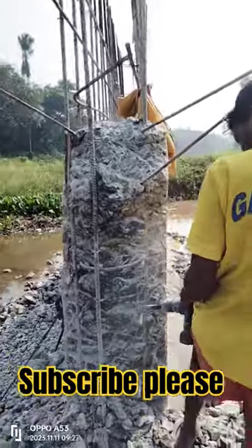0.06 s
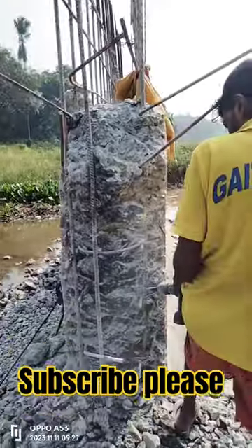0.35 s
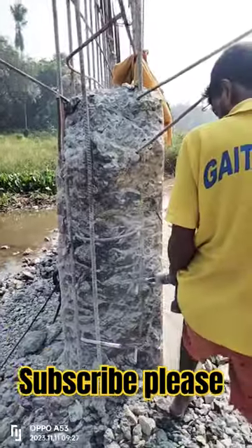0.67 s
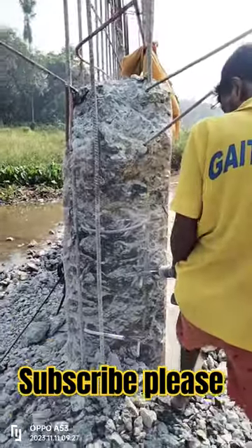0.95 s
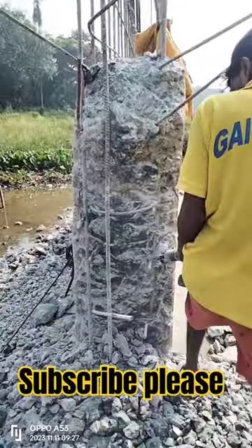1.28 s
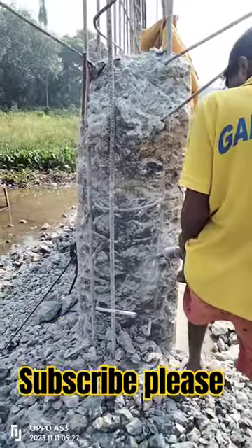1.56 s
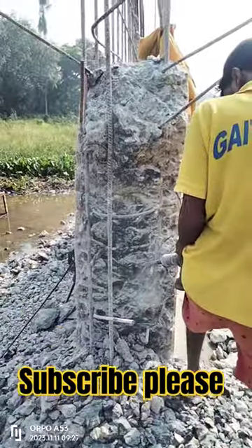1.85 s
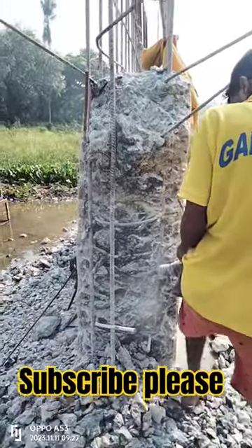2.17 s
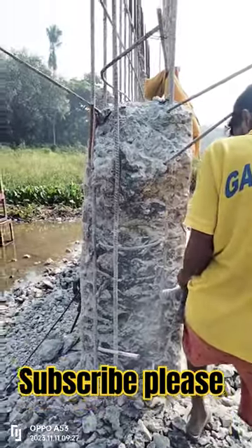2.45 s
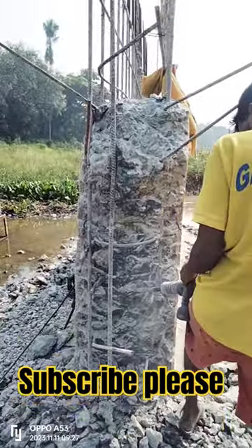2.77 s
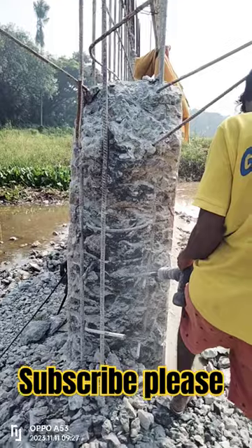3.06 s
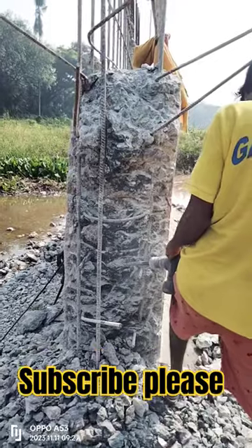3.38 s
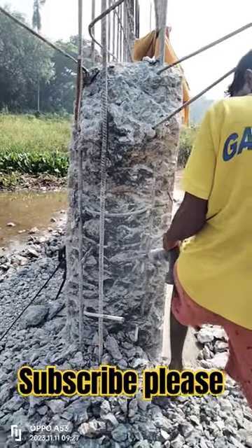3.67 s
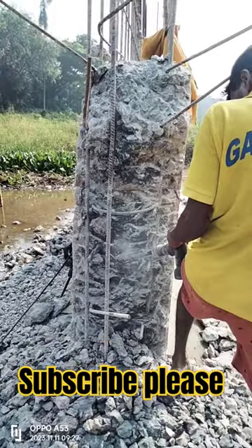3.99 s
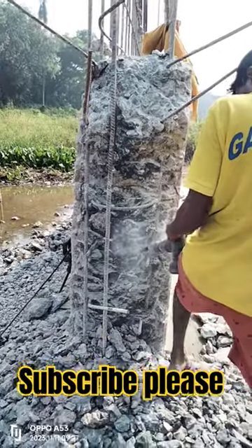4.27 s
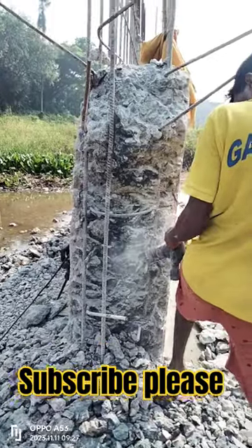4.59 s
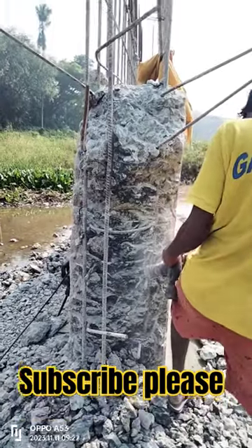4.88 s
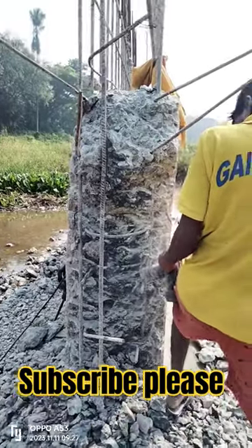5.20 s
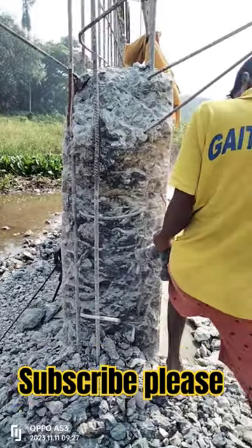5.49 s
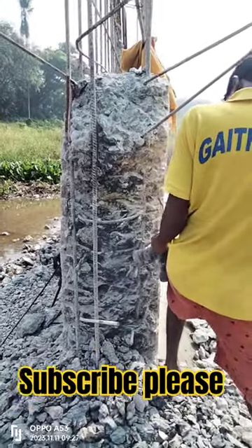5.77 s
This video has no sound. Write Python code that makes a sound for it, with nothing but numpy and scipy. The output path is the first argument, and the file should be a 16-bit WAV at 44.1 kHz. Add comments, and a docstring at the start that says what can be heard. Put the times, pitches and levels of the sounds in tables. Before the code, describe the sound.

An electric demolition hammer runs outdoors, a few steps away, its motor, fan and gears churning with a rattle and a thin high whine. At about 0.6 seconds the chisel starts striking a concrete pillar, roughly twenty-five blows a second in short bursts, each a sharp crack with clattering chips and a bright steel ring. A brief rising squeak comes near 1.3 seconds, and the blows turn to glancing metallic clinks toward 2 seconds. From 2 to about 3.1 seconds the hammering stops and the motor whirs freely, whining, with one light ping of the chisel. Rapid hammering then resumes and continues with tiny gaps until the end at about 6 seconds. Near 3.9 seconds the tool gives a faint howl and lumps break off with heavy knocks. More knocks follow between 4.5 and 5 seconds as the blows become firmer and more thudding.

```python
"""Demolition hammer on concrete

An electric hammer breaks a reinforced concrete pile outdoors, a few steps away. Its crank turns
about 25 times a second: pressed on, every turn drives the chisel into the concrete; lifted, only
gears and fan churn. Each blow is a crack, a knock and a thud, a short clatter of steel and chips,
and the ring of the chisel."""
import sys
import numpy as np
from scipy import signal
from scipy.fft import rfft, irfft
from scipy.io import wavfile
from scipy.ndimage import uniform_filter1d

SR = 44100
rng = np.random.default_rng(int(sys.argv[2]) if len(sys.argv) > 2 else 0)


def store_wav(level_fs):
    """Save 16-bit WAV to argv[1]."""
    pcm = np.round(np.clip(np.atleast_2d(level_fs), -1, 1) * 32767)
    wavfile.write(sys.argv[1], SR, pcm.T.astype(np.int16))


N = 266364
TIME = np.arange(N) / SR
BLOW_TIME = np.arange(4096) / SR
TURNS_PER_S = 25


def from_db(db):
    """Decibels to gain."""
    return 10 ** (np.asarray(db) / 20)


def unit_rms(x):
    """Scale each row to rms 1."""
    return x / np.sqrt(np.mean(x ** 2, axis=-1, keepdims=True) + 1e-20)


def curve(rows):
    """Interpolate (seconds, value) rows at every sample."""
    return np.interp(TIME, *np.transpose(rows))


def decay(t60_s):
    """Envelope that falls 60 dB in t60_s."""
    return from_db(-60 * BLOW_TIME / t60_s)


def lay(times, sounds):
    """Add one short sound at each time."""
    out = np.zeros(N + len(BLOW_TIME))
    for start_s, sound in zip(times, sounds):
        start = round(start_s * SR)
        out[start:start + len(sound)] += sound
    return out[:N]


def colour(x, spectrum, resonances=(), size=2048):
    """Minimum-phase filter with a given spectrum and resonant humps."""
    hz = np.maximum(np.arange(size // 2 + 1) * SR / size, 1)
    point_hz, point_db = np.transpose(spectrum)
    db = np.interp(np.log(hz), np.log(point_hz), point_db)
    for centre_hz, width_hz, lift_db in resonances:
        db = db + lift_db / (1 + (2 * (hz - centre_hz) / width_hz) ** 2)
    cepstrum = irfft(np.log(from_db(db)))
    cepstrum[1:size // 2] *= 2
    cepstrum[size // 2 + 1:] = 0
    impulse = irfft(np.exp(rfft(cepstrum)))
    return signal.fftconvolve(np.atleast_2d(x), impulse[None], axes=1)[:, :x.shape[-1]]


def bursts(times, level_db, envelope, spectrum, held_s, resonances=(), snap=0):
    """Dense modes dying together after an optional snap, with the energy of level_db held for held_s."""
    drive = rng.standard_normal((len(times), len(BLOW_TIME))) * envelope
    drive[:, 0] += snap * np.linalg.norm(envelope)
    sounds = unit_rms(colour(drive, spectrum, resonances))
    return lay(times, sounds * np.sqrt(held_s / BLOW_TIME[-1]) * from_db(level_db)[:, None])


def wavering_tone(rows, width_hz, steady):
    """Tone on a pitch and level curve: pure at steady=1, a narrow noise band at 0."""
    times, hz, level_db = np.transpose(rows)
    lowpass = signal.butter(2, width_hz / 2, fs=SR, output="sos")
    drift = signal.sosfilt(lowpass, rng.standard_normal((2, N)))
    along, across = unit_rms(drift) * np.sqrt(1 - steady)
    phase = 2 * np.pi * np.cumsum(np.interp(TIME, times, hz)) / SR
    wave = (np.sqrt(2 * steady) + along) * np.sin(phase) + across * np.cos(phase)
    return wave * np.interp(TIME, times, from_db(level_db), left=0, right=0)


# Runs of blows, paced by the load. Each row: first blow in seconds, last blow in seconds, count.
BLOW_RUNS = [(.5822, .7465, 5), (.8345, 1.044, 6), (1.1275, 1.3257, 6), (1.3625, 1.5998, 7),
             (1.644, 1.7605, 4), (1.8395, 1.9935, 5), (2.0297, 2.0297, 1), (3.1384, 3.1833, 2),
             (3.2235, 3.346, 4), (3.3903, 3.736, 9), (3.8178, 3.8972, 3), (3.9327, 3.9719, 2),
             (4.0215, 4.0215, 1), (4.0868, 4.5322, 13), (4.573, 4.741, 5), (4.7865, 4.9198, 4),
             (4.960, 5.128, 5), (5.1663, 5.4458, 8), (5.493, 5.493, 1), (5.526, 5.759, 7),
             (5.8013, 6.0018, 6)]


def blow_times():
    """One blow per crank turn, evenly spaced within a run."""
    return np.concatenate([np.linspace(first, last, round(count)) for first, last, count in BLOW_RUNS])


def crank():
    """Crank angle in radians, whole turns between blows, and load (1 while pressed on)."""
    blows_s = blow_times()
    start_s = blows_s[0] - np.ceil(blows_s[0] * TURNS_PER_S) / TURNS_PER_S
    strokes_s = np.concatenate([[start_s], blows_s, [blows_s[-1] + 1 / TURNS_PER_S]])
    turns = np.cumsum(np.round(np.diff(strokes_s, prepend=start_s) * TURNS_PER_S))
    hits = np.zeros(N)
    hits[np.round(blows_s * SR).astype(int)] = 1
    hits_per_s = uniform_filter1d(uniform_filter1d(hits, size=3600), size=1800) * SR
    load = np.clip(hits_per_s / TURNS_PER_S, 0, 1)
    return 2 * np.pi * np.interp(TIME, strokes_s, turns), load


# Machine noise as heard. Each row: time in seconds, base level in dB.
HEARD_LEVEL = [(0.0, -32), (0.49, -32), (0.57, -31), (0.77, -43), (0.93, -38), (1.35, -35), (1.5, -46.5),
               (1.61, -43), (1.92, -34.5), (2.34, -31.5), (3.18, -33.5), (3.5, -40.5), (3.95, -39),
               (4.05, -33.5), (4.19, -36.5), (4.31, -38.5), (4.61, -42.5), (4.71, -43.5), (5.0, -43.5),
               (5.38, -41.5), (5.74, -43.5), (6.04, -44)]
# Brief dips in gaps between blows. Each row: centre in seconds, depth in dB.
GAP_DIPS = [(.79, 2.5), (1.085, 11.5), (3.78, 2.5), (4.02, 11.5)]


def heard_db(half_width_s=0.043):
    """Machine noise level, ducked as by automatic gain control during hammering, with dips in gaps."""
    dips_db = sum(depth_db * np.exp(-((TIME - at_s) / half_width_s) ** 2) for at_s, depth_db in GAP_DIPS)
    return curve(HEARD_LEVEL) - dips_db


# Gear noise spectrum. Each row: frequency in Hz, relative density in dB.
GEAR_SPECTRUM = [(30, -9.5), (100, -14), (220, -5), (500, -6.5), (900, -2.5), (2000, -3.5), (3200, -4.5),
                 (4500, -3), (5300, -5), (7000, -1.5), (8800, 0.5), (10600, -13.5), (15500, -14.5)]
# Gear housing resonances. Each row: centre in Hz, width in Hz, lift in dB.
HOUSING_MODES = [(593, 260, 8.5), (888, 21, 7), (1194, 350, 4.5), (1670, 143, 7), (2470, 790, 2.5),
                 (3060, 500, 4), (3760, 500, 3.5), (4680, 200, 0.5), (9330, 190, -1), (13400, 410, 5.5)]


def motor(free_running_db=-33, gain_db=0.94):
    """Gear and fan noise throbs twice a turn; in hammering it ducks after a blow, swells before the next."""
    angle, load = crank()
    angle = angle + 1.0  # the swell leads the blow
    free_db = 2.0 * np.cos(2 * angle) + 0.37 * np.cos(angle)
    hammering_db = 3.0 * np.cos(angle) + 2.0 * np.cos(2 * angle)
    throb_db = (1 - load) * free_db + load * hammering_db
    noise = rng.standard_normal(N)
    grain_db = 1.84 * np.repeat(rng.standard_normal(N // 32 + 1), 32)[:N]
    churn = unit_rms(colour(noise * from_db(grain_db), GEAR_SPECTRUM, HOUSING_MODES)[0])
    treble = signal.sosfilt(signal.butter(1, 5000, "high", fs=SR, output="sos"), churn)
    lift_db = 1.0 + 0.22 * (free_running_db - curve(HEARD_LEVEL))  # thinner when quieter
    churn = churn + (from_db(lift_db) - 1) * treble
    return churn * from_db(heard_db() + throb_db + gain_db)


# Loose gear teeth. Each entry: ping frequency in Hz.
TOOTH_HZ = [2417, 3010, 3350, 3670, 4450, 4600]


def gear_rattle(pings_per_tooth_per_s=18, t60_s=0.032, gain_db=-10.0):
    """Gear teeth take up their slack at random and ping, following the heard machine level."""
    pings = 0
    radius = from_db(-60 / (t60_s * SR))
    for hz in TOOTH_HZ:
        touches = (rng.random(N) < pings_per_tooth_per_s / SR) * rng.uniform(0.77, 1, N)
        step_rad = 2 * np.pi * hz / SR
        feedback = [1, -2 * radius * np.cos(step_rad), radius ** 2]
        pings = pings + signal.lfilter([0, np.sin(step_rad)], feedback, touches + 1e-18)
    return unit_rms(pings) * from_db(heard_db() + gain_db)


# Commutator whine. Each row: time in seconds, pitch in Hz, level in dB.
WHINE_PATH = [(0, 2996, -43), (.35, 3000, -46), (.65, 2820, -57), (1.7, 3600, -57), (2.1, 3680, -45),
              (2.75, 3580, -43.5), (3.1, 3650, -70)]


def commutator_whine():
    """The commutator of the free-running motor whines in a narrow noise band."""
    return wavering_tone(WHINE_PATH, width_hz=300, steady=0)


# Share of a blow that glances off. Each row: time in seconds, share from 0 to 1.
GLANCING_SHARE = [(.6, 0.1), (1.0, .3), (1.6, 0.4), (1.68, 1), (1.72, 0.24), (1.8, 1), (2.03, 0.92),
                  (2.1, 0)]
# Spectra of the contact. Each row: frequency in Hz, relative density in dB.
CRACK_SPECTRUM = [(1500, -25), (3500, -15.5), (4600, -4.5), (5700, -1), (6400, -7.5), (7400, -2.5),
                  (8300, 2.5), (9300, -5), (10800, -15.5), (12000, -2.5), (13000, -21), (15500, -62)]
CLINK_SPECTRUM = [(1500, -42), (3300, -8), (4500, -4.5), (5600, -25), (7500, -11), (10000, -15.5),
                  (12000, -18), (15500, -33)]
CLATTER_SPECTRUM = [(250, -21), (650, -3.5), (1200, -5), (1650, -1), (2200, -7.5), (4700, -6.5),
                    (6400, -0.5), (7400, 2.5), (8400, -2.5), (10600, -6.5), (11900, -3.5), (12900, -6),
                    (15500, -17)]
# Bar resonances in a glancing blow. Each row: centre in Hz, width in Hz, lift in dB.
CLINK_RESONANCES = [(3810, 280, 5), (4757, 186, 16), (7580, 1400, 17.5), (9860, 980, 14), (11670, 210, 22)]


def chisel_contact(times, crack_db, clatter_db):
    """Biting steel cracks, then tool and chips clatter; glancing steel clinks."""
    crack = bursts(times, crack_db, decay(0.013), CRACK_SPECTRUM, held_s=0.0013, snap=0.56)
    clink_db = crack_db - 6 * (np.arange(len(times)) % 2)  # every second clink is weaker
    clink = bursts(times, clink_db, decay(0.017), CLINK_SPECTRUM, held_s=0.0023,
                   resonances=CLINK_RESONANCES)
    swell = decay(0.044) * (1 - decay(0.0085)) ** 2
    clatter = bursts(times, clatter_db, swell, CLATTER_SPECTRUM, held_s=0.016)
    glancing = curve(GLANCING_SHARE)
    return np.sqrt(1 - glancing) * (crack + clatter) + np.sqrt(glancing) * clink


def chisel_ring(times, level_db, modes, scatter_db, shift, blur_hz=70):
    """The bar rings lengthwise; grip shifts each mode per blow, and rubbing in the holder blurs it."""
    rings = 0
    for hz, mode_db, t60_s in modes:
        strength, detune, phase = rng.standard_normal((len(times), 3)).T[:, :, None]
        walk = np.cumsum(rng.standard_normal((len(times), len(BLOW_TIME))), axis=1)
        rubbing_rad = walk * np.sqrt(2 * np.pi * blur_hz / SR)
        wave = np.sin(2 * np.pi * (hz * (1 + shift * detune) * BLOW_TIME + phase) + rubbing_rad)
        gain = from_db(level_db[:, None] + mode_db + scatter_db * strength)
        rings = rings + wave * decay(t60_s) * gain
    return lay(times, rings)


# Spectrum of the shove on the pile. Each row: frequency in Hz, relative density in dB.
BOOM_SPECTRUM = [(25, 2.5), (70, -1.5), (150, -1), (300, 1), (550, 1.5), (1000, -13.5), (2000, -30)]


def boom(times, level_db, t60_s=0.008, held_s=0.0065):
    """The pile is shoved as a whole: one smooth pressure pulse per blow, of either sign."""
    pulse = unit_rms(colour(decay(t60_s), BOOM_SPECTRUM)) * np.sqrt(held_s / BLOW_TIME[-1])
    gains = from_db(level_db) * rng.choice([-1, 1], len(times))
    return lay(times, pulse * gains[:, None])


def jolts(times, level_db, settle_s=0.09):
    """Hard blows knock the microphone off its rest level, one way then back; it settles slowly."""
    kicks, offset = np.zeros(N), 0
    for at_s, gap_s, size in zip(times, np.diff(times, prepend=0), from_db(level_db)):
        offset *= np.exp(-gap_s / settle_s)
        kick = -size if offset > 0 else size
        kicks[round(at_s * SR)] = kick
        offset += kick
    steps = signal.lfilter([1], [1, -np.exp(-1 / (settle_s * SR))], kicks + 1e-18)
    return signal.sosfilt(signal.butter(1, 450, fs=SR, output="sos"), steps)


# Spectra of the struck concrete. Each row: frequency in Hz, relative density in dB.
KNOCK_SPECTRUM = [(500, -16.5), (1100, -1.5), (1600, 3.5), (2100, 3), (3000, 4.5), (4000, -1), (6000, -8)]
THUD_SPECTRUM = [(100, -34), (200, -4), (400, -4), (650, 0), (1000, -2), (1800, -14), (4000, -59)]


def pile(times, knock_db, thud_db, firm_thud_db=-27.5):
    """Concrete knocks and thuds; the firmer the thud, the more it booms and jolts."""
    knock = bursts(times, knock_db, decay(0.012), KNOCK_SPECTRUM, held_s=0.0032, snap=0.7)
    thud = bursts(times, thud_db, decay(0.0078), THUD_SPECTRUM, held_s=0.0022, snap=0.36)
    firmness_db = thud_db - firm_thud_db
    boom_db = -30 + 1.22 * firmness_db
    jolt_db = np.minimum(-28 + 1.37 * firmness_db, -20)
    return knock + thud + boom(times, boom_db) + jolts(times, jolt_db)


# How the chisel sits: loose at first, later dug in.
# Each row: time in seconds, then crack, clatter, knock, thud and ring levels in dB.
CONTACT_LEVELS = [(.58, -13, -19.5, -20.5, -46, -22), (.69, -15, -30, -31, -36, -31.5),
                  (.87, -17.5, -29, -28, -45, -30), (.94, -26, -34, -56, -47, -35),
                  (1.01, -16, -31, -30, -37, -35), (1.14, -21.5, -25, -49, -38.5, -47),
                  (1.3, -12.5, -23.5, -26, -42.5, -45), (1.44, -16.5, -38, -33, -49, -32.5),
                  (1.56, -18.5, -26.5, -30, -33.5, -27), (1.66, -21.5, -31, -44, -42, -44),
                  (1.76, -15, -21.5, -49, -44, -50), (2.0, -13.5, -29, -34, -37, -42),
                  (3.14, -15.5, -23.5, -34, -49, -35), (3.3, -20.5, -24.5, -31, -43, -29),
                  (3.66, -14, -27.5, -26.5, -37, -35), (3.8, -22, -29.5, -34, -41.5, -23),
                  (3.93, -8.5, -29, -20, -41, -39), (4.02, -22, -40, -46, -39, -52),
                  (4.14, -12, -26.5, -49, -44, -46), (4.46, -14.5, -32.5, -24.5, -35.5, -38),
                  (4.58, -14.5, -36, -25, -26.5, -44), (4.85, -13.5, -37, -24, -32, -36),
                  (5.08, -15.5, -46, -24.5, -32, -41), (5.431, -13.5, -33, -23.5, -28, -34),
                  (5.51, -16.5, -35, -29, -40, -52), (5.62, -15, -38.5, -25, -28.5, -42),
                  (6.0, -14.5, -31.5, -29.5, -27.5, -39)]
# Blow-to-blow scatter. Standard deviations in dB of crack, clatter, knock, thud and ring.
CONTACT_SCATTER_DB = [0.77, 1.6, 1.3, 1.5, 5.8]
# Chisel modes. Each row: frequency in Hz, relative level in dB, t60 in seconds.
LOWER_MODES = [(7290, -10, 0.031), (7260, -3.5, 0.071), (7800, -6, 0.031)]
UPPER_MODES = [(11000, -4, 0.054), (11950, 2, 0.081), (12200, -10, .05), (11400, -1.5, 0.066)]


def blows():
    """Each blow sounds the contact, the chisel and the pile, at levels set by how the chisel sits."""
    times = blow_times()
    contact_s, *columns = np.transpose(CONTACT_LEVELS)
    mean_db = np.array([np.interp(times, contact_s, column) for column in columns])
    chance_db = rng.standard_normal((len(times), len(columns))) * CONTACT_SCATTER_DB
    crack_db, clatter_db, knock_db, thud_db, ring_db = mean_db + chance_db.T
    contact = chisel_contact(times, crack_db, clatter_db)
    lower = chisel_ring(times, -14.5 + 0.42 * ring_db, LOWER_MODES, scatter_db=4.0, shift=0.0048)
    upper = chisel_ring(times, ring_db, UPPER_MODES, scatter_db=0.5, shift=0.0064)
    return contact + lower + upper + pile(times, knock_db, thud_db)


# Chisel bounces. Each row: start in seconds, lower ring level in dB, upper ring level in dB.
CHISEL_BOUNCES = [(.585, -26, -42), (.750, -40, -30), (1.445, -23, -38), (1.601, -19, -30),
                  (1.725, -16.5, -33), (2.7902, -17.5, -65), (3.345, -17.5, -42), (3.741, -16.5, -25),
                  (5.002, -24, -36)]
# Upper modes of the freed bar. Each row: frequency in Hz, relative level in dB, t60 in seconds.
FREE_MODES = [(11400, 3, 0.083), (12050, -2, .05)]


def bounces():
    """The bar bounces clear of the concrete and rings on."""
    times, lower_db, upper_db = np.transpose(CHISEL_BOUNCES)
    lower = chisel_ring(times, lower_db, LOWER_MODES, scatter_db=0.5, shift=0.0066)
    upper = chisel_ring(times, upper_db, FREE_MODES, scatter_db=1, shift=0.003)
    return lower + upper


# Lumps breaking off. Each row: start in seconds, knock level in dB, thud level in dB.
LUMP_BREAKS = [(1.1545, -18.5, -44), (1.3995, -31, -35.5), (3.9331, -24, -26), (3.9729, -23, -21),
               (4.5323, -26, -24.5), (4.573, -33, -27), (4.7864, -25.5, -25), (5.0016, -20.5, -26.5)]


def breaks():
    """A lump gives way with a heavy knock from the pile alone."""
    return pile(*np.transpose(LUMP_BREAKS))


# Squeak. Each row: time in seconds, pitch in Hz, level in dB.
SQUEAK_PATH = [(1.19, 580, -75), (1.225, 616, -42), (1.255, 684, -34), (1.275, 726, -35), (1.295, 842, -52),
               (1.325, 957, -39), (1.36, 980, -73)]


def squeak():
    """A short rising squeak, half tone and half noise."""
    return wavering_tone(SQUEAK_PATH, width_hz=130, steady=0.5)


# Housing howl. Each row: time in seconds, pitch in Hz, level in dB.
HOWL_PATH = [(3.2, 1690, -50), (3.75, 1657, -54), (3.85, 1647, -40), (3.91, 1590, -47), (3.98, 1650, -59),
             (4.1, 1627, -47), (4.45, 1645, -46), (4.62, 1658, -86), (6.04, 1682, -70)]


def housing_howl():
    """The housing howls as the tool is leaned on."""
    return wavering_tone(HOWL_PATH, width_hz=150, steady=0)


def scene():
    """The machine and its blows, in mono."""
    machine = motor() + gear_rattle() + commutator_whine() + housing_howl() + squeak()
    return (machine + blows() + breaks() + bounces())[None]


def record(dry, ceiling=0.44, cutoff_hz=15400):
    """Round off the sharpest peaks, then cut the top treble."""
    lowpass = signal.ellip(10, 0.2, 70, cutoff_hz, fs=SR, output="sos")
    return signal.sosfilt(lowpass, ceiling * np.tanh(dry / ceiling))


dry = scene()
out = record(dry)
store_wav(out)
```